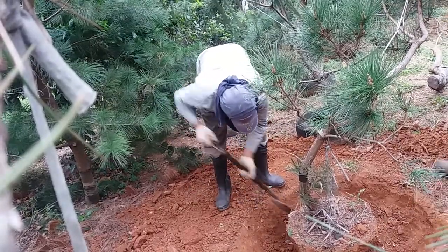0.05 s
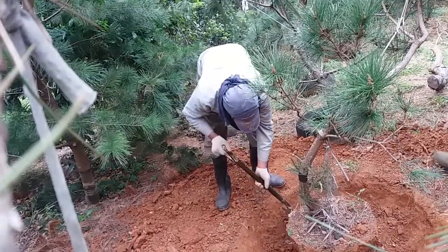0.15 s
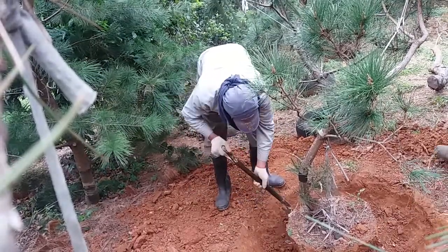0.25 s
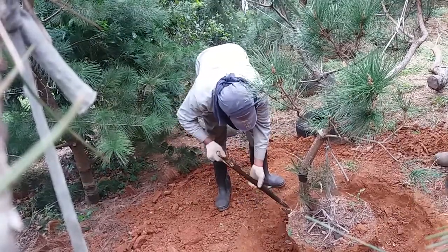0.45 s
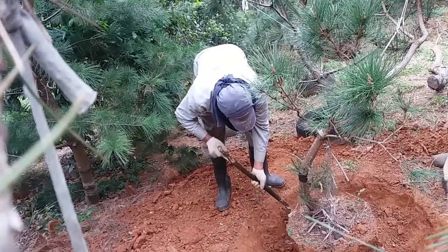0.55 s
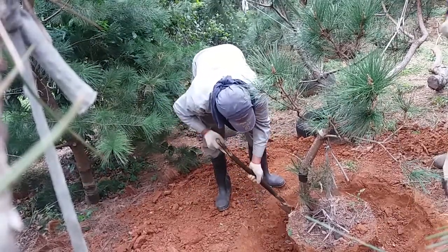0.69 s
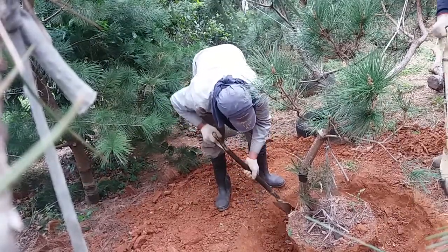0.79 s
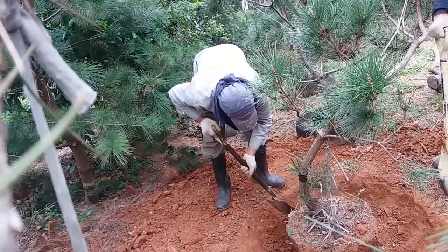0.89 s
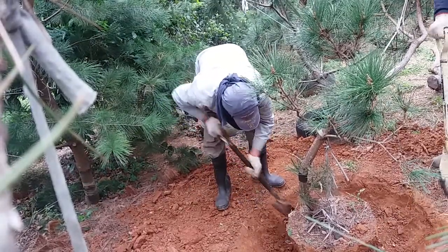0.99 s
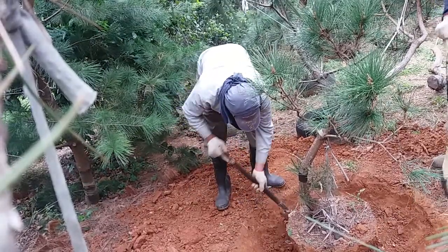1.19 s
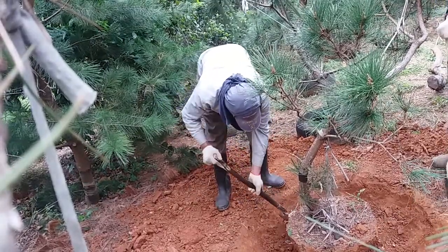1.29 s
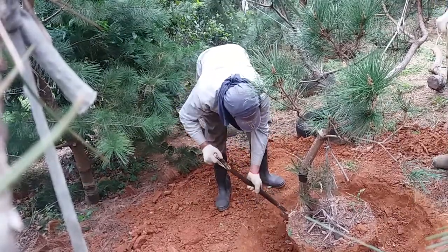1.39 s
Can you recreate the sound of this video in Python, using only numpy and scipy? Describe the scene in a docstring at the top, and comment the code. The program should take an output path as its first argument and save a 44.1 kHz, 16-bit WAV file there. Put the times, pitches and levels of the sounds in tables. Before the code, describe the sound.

A steel spade is driven into hard clay, thudding and clanking with a brief metallic ring and gritty crunch; faint scrapes and crumbling soil follow, then a second, duller chop. Close microphone outdoors among trees, quiet low rumble.

```python
"""Outdoors among trees, over a quiet rumble, a steel spade is driven twice into hard clay.
The first thrust thuds and meets something stony: the blade clanks and rings. The second is a dull chop.
Thuds and rings are sums of dying modes; cracking, scraping and sliding soil are streams of filtered grains.
Around the blows the blade scrapes and crumbs slide; trees and a far bank return the sound."""
import sys
import numpy as np
from scipy import signal
from scipy.io import wavfile
from scipy.ndimage import uniform_filter1d

SR = 44100
rng = np.random.default_rng(int(sys.argv[2]) if len(sys.argv) > 2 else 0)


def wav_out(sig):
    """Save sig, one row per channel (or a flat mono array), as 16-bit PCM at SR to the path in sys.argv[1]."""
    wavfile.write(sys.argv[1], SR, np.round(np.clip(np.atleast_2d(sig).T, -1, 1) * 32767).astype(np.int16))


N = 63945


def amp(db):
    """Decibels to gain."""
    return 10 ** (np.asarray(db) / 20)


def unit(x):
    """Scales to rms 1."""
    return x / np.sqrt(np.mean(x ** 2) + 1e-20)


def read(points, hz, column=1):
    """Interpolates one table column on a log-frequency axis."""
    table = np.transpose(points)
    return np.interp(np.log(hz + 1), np.log(table[0] + 1), table[column])


def add(mix, start_s, sound):
    """Mixes in a sound at start_s, trimming whatever falls outside the mix."""
    at = round(start_s * SR)
    sound = sound[max(-at, 0):]
    part = mix[max(at, 0):][:len(sound)]
    part += sound[:len(part)]


def colour(x, gain, size=2048):
    """Causal minimum-phase filter with magnitude gain(hz)."""
    hz = abs(np.fft.fftfreq(size, 1 / SR))
    log_gain = np.log(np.maximum(gain(hz), 1e-5))
    impulse = np.fft.ifft(np.exp(np.conj(signal.hilbert(log_gain)))).real
    return signal.fftconvolve(x, impulse)[:len(x)]


def softness(hz, bright_hz):
    """Gain of a soft contact, which leaves out the treble above bright_hz."""
    return 1 / np.sqrt(1 + (hz / bright_hz) ** 4)


def low_cut(x, hz):
    """Second-order high-pass."""
    return signal.sosfilt(signal.butter(2, hz, "high", fs=SR, output="sos"), x)


def grains(per_s, spread_db, spectrum):
    """Tiny fractures at random times, random in sign, coloured by a spectrum, rms 1."""
    size = amp(spread_db * np.minimum(rng.exponential(1, N), 4)) * rng.choice([-1, 1], N)
    impulses = size * (rng.random(N) < per_s / SR)
    return unit(colour(impulses, lambda hz: amp(read(spectrum, hz))))


AIR_DB, AIR_PATCHY_DB = -53.5, 1.73
# outdoor noise spectrum: f/Hz, relative level/dB per Hz
AIR_SPECTRUM = [(25, -48.5), (47, -11), (62, -2), (95, -3.5), (150, -10.5), (200, -10.5), (290, -7.5),
                (480, -14.5), (700, -17.5), (1500, -24.5), (3200, -28), (4500, -34), (6300, -39),
                (16000, -40)]


def air():
    """Low outdoor rumble and faint hiss: shaped noise in patches over time and frequency."""
    hz, _, z = signal.stft(rng.standard_normal(N), SR, nperseg=2048, noverlap=1536)
    across_hz = uniform_filter1d(rng.standard_normal(z.shape), size=14, axis=0)
    patches = unit(uniform_filter1d(across_hz, size=5, axis=1))
    z = z * amp(read(AIR_SPECTRUM, hz)[:, None] + AIR_PATCHY_DB * patches)
    noise = signal.istft(z, SR, nperseg=2048, noverlap=1536)[1][:N]
    return amp(AIR_DB) * unit(noise)


TREES_DELAY_S, TREES_RISE_S = 0.011, 0.0066
# scatter from trees and banks: f/Hz, relative level/dB, t60/s
TREE_SCATTER = [(80, -9.5, .25), (200, -2, 0.24), (500, -19, 0.094), (720, -13, 0.13), (950, -8, .24),
                (1260, -25.5, .22), (2170, -10, .26), (4800, -11.5, .25), (8000, -7, 0.3),
                (15000, -7.5, .22)]


def trees(x):
    """A diffuse outdoor tail of noise, each band dying at its own speed."""
    late_s = np.maximum(np.arange(SR // 2) / SR - TREES_DELAY_S, 0)
    hz, t, z = signal.stft(rng.standard_normal(len(late_s)), SR, nperseg=256)
    t60_s = read(TREE_SCATTER, hz, column=2)[:, None]
    decay = amp(read(TREE_SCATTER, hz)[:, None] - 60 * t / t60_s)
    equal_energy = np.sqrt(2 * np.log(1000) / (t60_s * SR))  # offsets the decay length
    tail = signal.istft(z * decay * equal_energy, SR, nperseg=256)[1][:len(late_s)]
    return signal.fftconvolve(x, tail * np.minimum(late_s / TREES_RISE_S, 1))[:N]


ECHO_S, ECHO_SPREAD_S, ECHO_DB, ECHO_HZ = .133, .055, -33.5, 2000


def echo(x):
    """A faint, dull return from a far bank, smeared by a fading noise burst."""
    u = np.arange(0, ECHO_SPREAD_S, 1 / SR) / ECHO_SPREAD_S
    smear = rng.standard_normal(SR)[:len(u)] * (1 - u ** 2)
    out = np.zeros(N)
    add(out, ECHO_S, signal.fftconvolve(x, smear / np.linalg.norm(smear)))
    return amp(ECHO_DB) * colour(out, lambda hz: softness(hz, ECHO_HZ))


CONTACT_S = 0.000636  # force build-up


def ring(modes, bright_hz=SR, free=1, low_hz=0):
    """Dying modes after one contact; neighbours swing in opposite directions."""
    t = np.arange(SR // 2) / SR
    swing = np.zeros(len(t))
    for k, (hz, db, t60_s) in enumerate(modes):
        drive = (-1) ** k * softness(hz, bright_hz) * softness(low_hz, hz)
        swing += drive * amp(db - 60 * t / (t60_s * free)) * np.sin(2 * np.pi * hz * t)
    return swing * (1 - np.exp(-(t / CONTACT_S) ** 2))


# modes of the packed ground: f/Hz, relative level/dB, t60/s
GROUND_MODES = [(192, -9, 0.051), (329.3, -4, 0.038), (449, -4.5, 0.041), (683, -0.5, 0.0226),
                (1401, -2, .013), (1651, -8.5, 0.027), (2280, -13.5, 0.034)]


def ground_thud():
    """The packed ground's short modes after one contact."""
    return ring(GROUND_MODES)


# modes of blade and shaft: f/Hz, relative level/dB, free t60/s
BLADE_MODES = [(350, -10, 0.045), (552.4, -2, 0.045), (713, 1, .044), (729, -23, 0.21), (1199.6, -3, 0.048),
               (1317, -7, 0.036), (1460, -13, 0.0356), (1665, -18.5, 0.041), (1980, -22, .12),
               (2296, -17.5, 0.078), (2653, -15, 0.073), (2650, -19, 0.095), (3150, -14, 0.065),
               (3438, -19, 0.086), (3670, -18, 0.1036), (4164, -23.5, 0.127), (4440, -18, .11),
               (4630, -13.5, .08), (4880, -20, 0.088), (5310, -22.5, .1)]


def blade_ring(bright_hz=SR, free=1, low_hz=0):
    """Steel modes driven between low_hz and bright_hz; clay leaves a share of the free ring time."""
    return ring(BLADE_MODES, bright_hz, free, low_hz)


GRAINS_PER_S, GRAIN_SPREAD_DB = 2800, 0
# grit spectrum: f/Hz, relative level/dB per Hz
GRIT_SPECTRUM = [(100, -10), (600, 0), (1100, -2), (1700, -5.5), (2700, -1), (4500, -9), (6500, -14.5),
                 (11000, -20), (16000, -27.5)]
# blade rubbing and soil sliding: t/s, length/s, level/dB, blade ring level re grit/dB
SCRAPES_TABLE = [(-0.03, 0.18, -59, -30), (0.123, .085, -61.5, -28), (0.384, .045, -52.5, -2),
                 (0.411, 0.14, -62, -10), (0.569, 0.068, -54, -11), (0.694, 0.063, -64, -3),
                 (0.836, .05, -65, -15), (0.904, 0.026, -65, -1.5), (1.1, .06, -73, 14),
                 (1.217, .042, -66, -19)]


def scrapes():
    """Half-sine swells of grit that also stir the blade's modes."""
    out, blade = np.zeros(N), blade_ring()
    for start_s, length_s, db, ring_db in SCRAPES_TABLE:
        grit = grains(GRAINS_PER_S, GRAIN_SPREAD_DB, GRIT_SPECTRUM)
        stirred = unit(signal.fftconvolve(grit, blade)[:N])
        rub = grit + amp(ring_db) * stirred
        u = np.arange(0, length_s, 1 / SR) / length_s
        add(out, start_s, amp(db) * np.sin(np.pi * u) * rub[-len(u):])
    return out


DRAG_RISE_S, DRAG_T60_S, DRAG_LEAK_DB = 0.014, 0.23, -21.5
DRAG_PER_S, DRAG_SPREAD_DB = 3000, 3.5
# grit on steel: f/Hz, relative level/dB per Hz
DRAG_SPECTRUM = [(150, -4), (500, -2.5), (1000, -4), (1900, -0.5), (2800, -3), (5200, 1.5), (5800, -9.5),
                 (7300, -10.5), (11000, -12), (16000, -21.5)]


def drag(bright_hz):
    """Grit hisses along the steel as the blade slows down; some treble leaks past bright_hz."""
    t = np.arange(SR // 2) / SR
    fade = np.minimum(t / DRAG_RISE_S, 1) * amp(-60 * t / DRAG_T60_S)
    hiss = fade * grains(DRAG_PER_S, DRAG_SPREAD_DB, DRAG_SPECTRUM)[-len(t):]
    return colour(hiss, lambda hz: softness(hz, bright_hz) + amp(DRAG_LEAK_DB))


CRUNCH_LEAD_DB, CRUNCH_T60_S = -9, 0.042
CRUNCH_LEAK_DB = -13  # fine cracking that even a dull blow keeps
CRACKS_PER_S, CRACK_SPREAD_DB = 20000, 1
# cracking clay: f/Hz, relative level/dB per Hz
CRUNCH_SPECTRUM = [(60, -16.5), (300, -2), (950, -12), (1400, 0), (1750, -10), (2600, 0), (5200, -5.5),
                   (5800, -16), (7200, -6.5), (8200, -16.5), (12000, -20), (16000, -28.5)]


def crunch(bright_hz, lead_s):
    """The edge breaks the crust over lead_s, then the clay cracks in a short burst."""
    t = np.arange(SR // 4) / SR - lead_s
    lead_db = CRUNCH_LEAD_DB * np.maximum(-t, 0) / lead_s
    burst = amp(lead_db - 60 * np.maximum(t, 0) / CRUNCH_T60_S)
    cracks = grains(CRACKS_PER_S, CRACK_SPREAD_DB, CRUNCH_SPECTRUM)[-len(t):]
    return colour(burst * cracks, lambda hz: softness(hz, bright_hz) + amp(CRUNCH_LEAK_DB))


# contacts, the first two in one thrust: t/s, crust-breaking lead/s, thud level/dB, blade ring level/dB,
# crunch level/dB, grit drag level/dB, contact low edge f/Hz, contact high edge f/Hz, share of free ring time
BLOWS_TABLE = [(0.2283, 0.0014, -13, -9, -13.5, -54, 151, 1540, 1),
               (0.2338, .0003, -31, -7.5, -12, -25.5, 1300, 8500, .9),
               (1.1698, .0004, -12, -11, -23, -35.5, 202, 1760, 0.25)]


def blows():
    """Each contact thuds in the ground, rings the blade, cracks the clay and drags through grit."""
    out = np.zeros(N)
    for start_s, lead_s, thud_db, ring_db, crunch_db, drag_db, low_hz, bright_hz, free in BLOWS_TABLE:
        add(out, start_s, amp(thud_db) * ground_thud())
        add(out, start_s, amp(ring_db) * blade_ring(bright_hz, free, low_hz))
        add(out, start_s - lead_s, amp(crunch_db) * crunch(bright_hz, lead_s))
        add(out, start_s, amp(drag_db) * drag(bright_hz))
    return out


THUD_LOW_HZ = 106  # a small blade radiates little bass


def scene():
    """The open air, the spade, its scatter from the trees and a far echo."""
    spade = low_cut(blows() + scrapes(), THUD_LOW_HZ)
    return (air() + trees(spade) + echo(spade) + spade)[None]


MIC_LOW_HZ, CUT_HZ = 50, 16200


def record(dry):
    """The microphone's bass roll-off and the recorder's band limit."""
    band_limit = signal.firwin(511, CUT_HZ, window=("kaiser", 9), fs=SR)
    return signal.oaconvolve(low_cut(dry, MIC_LOW_HZ), band_limit[None], "same")


dry = scene()
out = record(dry)
wav_out(out)
```